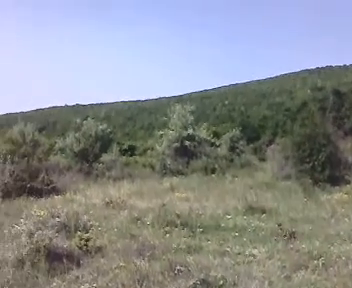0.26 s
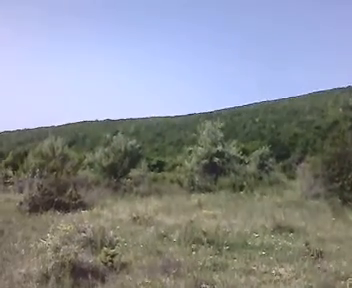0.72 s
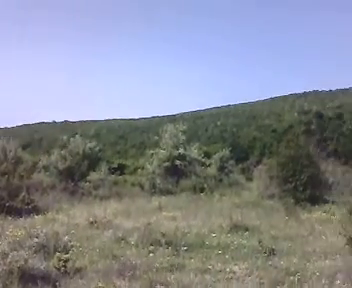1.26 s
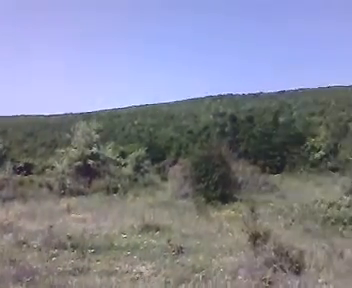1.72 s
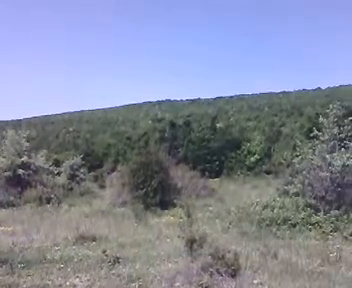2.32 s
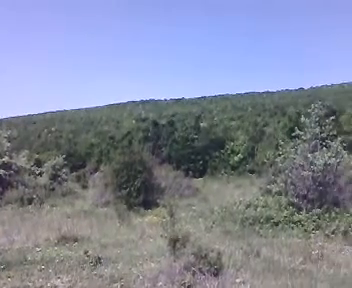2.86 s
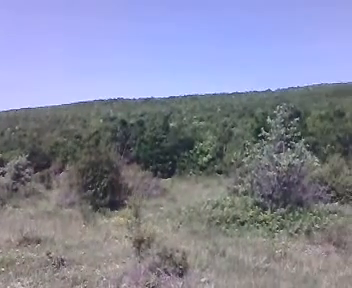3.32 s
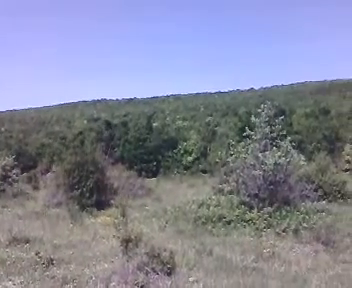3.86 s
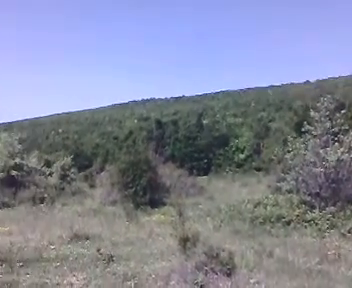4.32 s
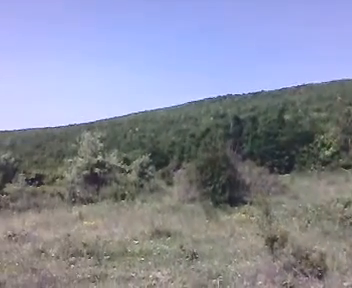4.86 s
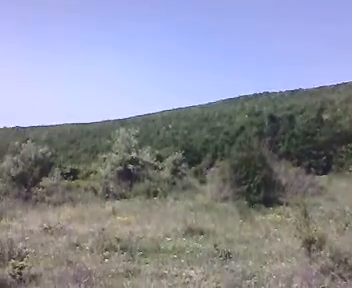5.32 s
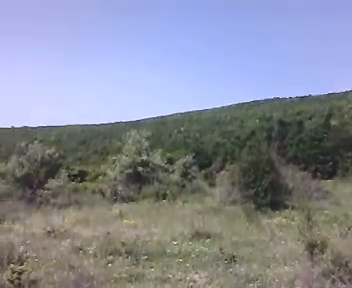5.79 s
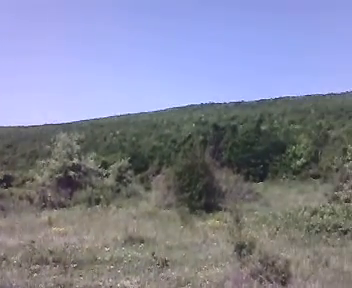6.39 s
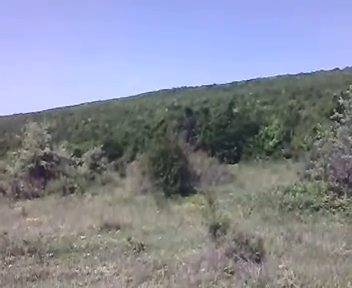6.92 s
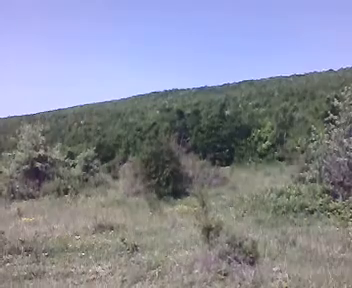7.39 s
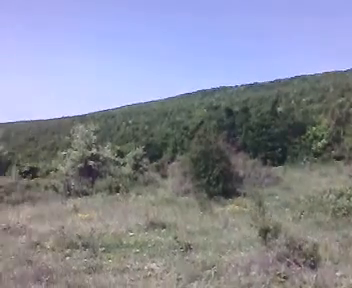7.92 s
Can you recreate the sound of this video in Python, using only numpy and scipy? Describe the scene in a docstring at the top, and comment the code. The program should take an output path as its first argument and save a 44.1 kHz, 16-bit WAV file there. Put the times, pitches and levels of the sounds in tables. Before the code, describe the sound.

Open scrubland, one channel, a small hissy microphone with two barely audible high whines. At 0 s the breathy, hoarse end of a bark fades over a wind puff. Thirteen short barks follow, at about 0.2, 0.6, 1.6, 2.9, 3.4, 3.8, 4.5, 4.9, 5.6, 6.0, 6.4, 7.6 and 8.1 s. Each yelps upward to around 450 Hz, cracks to a held note near 620 Hz, then breaks off roughly, leaving a faint hillside echo. A tiny tick repeats every 0.7 s from 0.65 s. Birds chirp thinly around 1.05 and 1.2 s, lower at 2.1 s, then near 4.8-5.3 and 6.1-7.0 s, over random distant twitter. Low wind thumps swell around 1.9 and 2.4-2.6 s, flutter near 3.6-3.9 s, calm from about 5 to 7 s, and peak at 7.7 s. Small rustles come at 3.9, 7.0 and 7.15 s.

```python
"""Open-air scene in a single channel: a hound on a scrubby hillside, wind, and a small camera's own noise.
At once: the hoarse end of a bark, resonant noise, over filtered-noise gusts, hiss and two thin whines.
From 0.24 s thirteen barks follow in quick runs: harmonics on a gliding pitch, with rasp and a faint echo.
A regular tick joins at 0.65 s and nearer birds, gliding sines, at 1.05 s; fainter twitter falls at random.
Short rustles, puffs of noise, come at 3.9 s and near 7 s; the wind thumps hardest at 7.7 s."""
import sys
import numpy as np
from scipy import signal
from scipy.fft import rfft, irfft
from scipy.io import wavfile

SR = 44100
rng = np.random.default_rng(int(sys.argv[2]) if len(sys.argv) > 2 else 0)


def transcribe(u):
    """Save the signal u as a 16-bit wav file named by the first command-line argument.

    u: samples, shape (n,) or (channels, n), limited to [-1, 1]; the rate is SR.
    q: integer samples, one column per channel.
    """
    v = np.clip(np.atleast_2d(u).T, -1, 1)
    q = np.round(v * 32767).astype(np.int16)
    wavfile.write(sys.argv[1], SR, q)


def undo_db(level):
    """Turn decibels back into plain size, where 20 dB means ten times bigger."""
    steps = np.asarray(level, float) / 20
    return 10 ** steps


N = 359856

# One row a bark: (opening yelp [s], climb [s], yelp level [dB], yelp pitch [Hz],
# held fundamental against the usual voice [dB], held third harmonic likewise [dB], closing pitch [Hz])
BARKS = [(0.242, 0.027, -30.5, 433, 6, 3, 610), (0.613, 0.036, -28.5, 471, 3.5, 8.5, 630),
         (1.567, 0.035, -27, 464.5, 8, 7.5, 456), (2.941, 0.03, -27, 453.5, -11, -4, 430),
         (3.372, 0.03, -30, 428.6, 5.5, -13, 410), (3.766, 0.03, -30.5, 416, 11.5, -10, 460),
         (4.508, 0.036, -31, 439, 0.5, 0.5, 420), (4.934, 0.033, -29.5, 443.5, -9, 2, 385),
         (5.598, 0.026, -29, 428.5, 3, 7, 600), (5.982, 0.029, -33, 388, 16, -7.5, 584),
         (6.386, .038, -27.5, 446.8, -6.5, -17, 385), (7.647, 0.034, -27, 446, -15, 4.5, 400),
         (8.057, 0.034, -31, 435.6, 15, 3, 600)]
# Held part of each bark, one list a bark: (time [s], pitch [Hz], effort [dB], roughness [dB])
HELD_NOTES = [
    [(0.27, 620.4, -36, -3), (0.294, 636, -27, -23.5), (0.31, 659, -29, -18), (0.344, 634, -33, -10),
     (0.36, 618, -41, 1.5)],
    [(0.634, 602, -36, -3.5), (0.653, 626, -25, -34.5), (0.665, 637.4, -24.5, -37),
     (0.697, 621, -24.5, -28.5), (0.707, 663, -29.5, -14.5), (0.732, 638, -35, -4.5)],
    [(1.6, 626.6, -28, -26), (1.63, 617.5, -27.5, -31), (1.666, 626, -33, -23), (1.682, 550, -35, -17)],
    [(2.967, 613, -23.5, -19), (2.989, 642.8, -22, -13), (3.029, 701.4, -27.5, -22),
     (3.043, 593, -20, -25.5), (3.065, 631, -26.5, -24.5)],
    [(3.411, 598, -35, -3.5), (3.423, 639.4, -27, -20), (3.455, 671.5, -30.5, -18), (3.476, 662, -34, -10),
     (3.49, 617, -26, -22), (3.503, 600, -36.5, -7)],
    [(3.806, 623.4, -27, -18.5), (3.844, 625, -28, -30.5), (3.862, 633.5, -29, -25.5),
     (3.878, 647, -35.5, -9)],
    [(4.537, 613, -31, -12.5), (4.555, 600, -31, -15), (4.591, 586.5, -29, -17), (4.627, 621, -31.5, -14)],
    [(4.966, 616, -26, -17.5), (5.02, 584.4, -25.5, -18.5), (5.036, 612, -26, -30.5),
     (5.048, 620, -31, -31)],
    [(5.635, 648.6, -20.5, -13), (5.641, 642, -21.5, -22), (5.665, 665.7, -23.5, -19.5),
     (5.705, 658.5, -24, -23), (5.714, 650, -31.5, -11), (5.731, 624, -36, -3.5)],
    [(6.02, 559, -39.5, -18), (6.029, 593, -28, -28), (6.055, 593.5, -31, -35), (6.079, 601, -27.5, -16.5),
     (6.087, 644, -37.5, -13), (6.105, 629, -39, -10.5)],
    [(6.408, 576.6, -27, -15), (6.416, 605, -18.5, -27), (6.442, 654, -20, -31), (6.478, 624.5, -28, -13.5),
     (6.515, 466, -36, -13.5)],
    [(7.694, 650, -25.5, -13.5), (7.748, 562.3, -30.5, -18), (7.758, 617.5, -24, -33),
     (7.768, 615, -34, -19)],
    [(8.091, 564, -39.5, -22), (8.101, 616.3, -35, -10), (8.141, 587, -38.5, -12.5), (8.158, 590, -39, -6)],
]
# Climb common to all barks: (share of climb still to go [1], share of yelp pitch [1],
# level against the yelp [dB], roughness [dB])
CLIMB = [(.999, .68, -15, -9), (0.54, .86, -17, -16.5), (0.0044, .999, -1.36, -18.5)]
# Slackening folds: (time after the held part [s], level against its end [dB], roughness [dB])
RELEASE = [(.015, -13, -3.5), (0.035, -24, -12.5)]
# Usual fundamental against effort: (pitch [Hz], level [dB])
FIRST_HARMONIC = [(300, -15), (420, -27), (530, -15), (600, -19.5), (650, -16), (690, 4)]
# Second harmonic passing a dull spot of the throat: (pitch [Hz], weight [dB])
SECOND_HARMONIC = [(300, -11), (380, 3.5), (435, 3), (480, -5.5), (530, -0.5), (585, -0.8)]
# Usual third harmonic against effort: (pitch [Hz], level [dB])
THIRD_HARMONIC = [(300, 0.5), (430, -3), (520, -2), (600, -12), (660, -18.5)]
# Colour of the harmonics above the third: (frequency [Hz], level [dB])
MOUTH_COLOUR = [(1200, 4.5), (2000, -15), (2500, -23.5), (3100, -39.5), (3780, -39), (5000, -68.5)]
# Colour of the breathy rasp: (frequency [Hz], level [dB])
RASP_COLOUR = [(400, -33.5), (850, 0.5), (1030, -24), (1280, -15.5), (1500, -10.5), (1750, -0.5),
               (2400, -3.5), (2900, -20), (4000, -58.5)]
# Fixed resonance of the throat, one row: (frequency [Hz], width [Hz], level [dB])
THROAT = (850, 110, -4)
# Hoarse end of an earlier bark: (time [s], level [dB], centre frequency [Hz])
HOARSE_END = [(0.0, -46, 1440), (0.008, -42.5, 1378), (0.164, -58, 1127), (0.2, -53, 1200)]
# Near-sine bird notes: (time [s], length [s], start [Hz], middle [Hz], end [Hz], level [dB])
CHIRPS = [(1.048, 0.0088, 4380, 4640, 5000, -62), (1.062, 0.0086, 5200, 5000, 4900, -54),
          (1.069, 0.047, 4650, 4620, 4740, -57.5), (1.203, .012, 4320, 4520, 4800, -65),
          (1.217, 0.013, 4800, 4800, 4700, -59), (1.226, 0.042, 4600, 4550, 4550, -60),
          (2.131, 0.02, 1500, 1720, 1760, -39.5), (2.147, 0.038, 1820, 1824, 1800, -41.5),
          (2.181, 0.038, 1690, 1590, 930, -51.5), (4.754, 0.026, 2750, 2960, 3200, -66),
          (5.054, 0.039, 3220, 2950, 2710, -65), (5.141, 0.034, 3100, 3000, 2660, -67),
          (5.25, 0.019, 3110, 2840, 2754, -63), (6.103, 0.032, 3950, 3670, 3600, -60.5),
          (6.17, 0.04, 5700, 4860, 4300, -63), (6.198, 0.095, 4450, 4080, 3900, -61.5),
          (6.214, 0.09, 3570, 3270, 3150, -67), (6.436, 0.038, 3950, 3640, 3700, -57.5),
          (6.59, 0.041, 5950, 5460, 4200, -61), (6.601, 0.043, 3250, 3440, 3520, -58),
          (6.867, 0.098, 3150, 3060, 2900, -65), (6.942, 0.057, 4260, 3840, 3950, -61),
          (7.005, 0.042, 1300, 1466, 1700, -55)]
# Short rustles: (time [s], level [dB], centre [Hz], width [Hz], Gaussian spread [s])
RUSTLES = [(3.872, -51.5, 5030, 890, 0.0045), (7.004, -50.5, 1200, 700, 0.026),
           (7.155, -45.5, 3550, 1000, 0.0093)]
# Decay of the hillside's echo: (frequency [Hz], time to fall 60 dB [s])
SLOPE_DECAY = [(500, 0.42), (1300, 0.53), (2500, 0.73)]
# Strength of the wind: (time [s], level [dB])
WIND_STRENGTH = [(0.0, -42.5), (0.07, -32), (0.13, -52), (0.29, -44.5), (0.59, -58.5), (1.41, -59.5),
                 (1.45, -53), (1.82, -63), (1.91, -33.5), (1.95, -31), (2.07, -48.5), (2.2, -52),
                 (2.23, -36), (2.36, -50), (2.41, -26), (2.54, -31), (2.57, -26.5), (2.61, -44),
                 (2.95, -58.5), (3.5, -38), (3.57, -42), (3.61, -30), (3.84, -36.5), (3.88, -29.5),
                 (4.0, -61), (4.2, -42), (4.23, -55), (4.39, -36), (4.45, -48.5), (4.61, -39),
                 (4.63, -49.5), (4.82, -56.5), (4.86, -42), (4.91, -53.5), (5.64, -61), (7.07, -61),
                 (7.3, -35), (7.41, -49), (7.45, -31.5), (7.54, -33), (7.68, -20), (7.73, -31.5),
                 (7.95, -32.5), (7.98, -50.5), (8.09, -41), (8.16, -50)]
# Colour of the wind's thumps: (frequency [Hz], level [dB])
THUMP_COLOUR = [(8.8, -58.5), (15, -18.5), (45, -2.5), (87, -1.5), (102, -1.5), (123, -6), (151, -9),
                (200, -19.5), (260, -53), (440, -120)]
# Colour of the wind's upper rumble: (frequency [Hz], level [dB])
ROAR_COLOUR = [(80, -17), (140, 3.5), (250, -0.5), (350, -9), (550, -50)]
# Colour of the hiss: (frequency [Hz], level [dB])
HISS_COLOUR = [(24, -30), (40, 0), (169, -18), (344, -8.5), (714, -13.5), (4700, -26.5), (7160, -30.5),
               (8000, -37), (10400, -76.5), (17600, -120)]
# Thin steady whines: (frequency [Hz], peak level [dB])
WHINES = [(3660, -74.5), (6098, -73)]


def evened(x):
    """Normalisation: scales a signal to rms 1."""
    return x / np.sqrt(np.mean(abs(x) ** 2) + 1e-20)


def read(points, hz):
    """Spectral interpolation: reads a table linearly in level along a logarithmic frequency axis."""
    f, value = np.transpose(points)
    return np.interp(np.log(hz + 1), np.log(f + 1), value)


def curve(rows, t):
    """Linear interpolation: the columns of a table at times t."""
    s, *columns = np.transpose(rows)
    return [np.interp(t, s, c) for c in columns]


def add(mix, s, sound):
    """Superposition: sums a sound into the mix from time s."""
    part = mix[round(s * SR):][:len(sound)]
    part += sound[:len(part)]


def coloured(points, count):
    """Spectral shaping: white noise weighted by a spectrum table, at rms 1."""
    spectrum = rfft(rng.standard_normal(count))
    gain = undo_db(read(points, np.fft.rfftfreq(count, 1 / SR)))
    return evened(irfft(spectrum * gain, count))


def flutter(count, hz):
    """Narrow-band modulation: complex noise low-passed at hz, with rms 1."""
    z = rng.standard_normal((count, 2)) @ [1, 1j]
    return evened(signal.lfilter(*signal.butter(2, hz, fs=SR), z))


def gesture(yelp, climb, yelp_db, yelp_hz, first_db, third_db, closing_hz, held):
    """Vocal control: climb, yelp, crack, held note and release set pitch, effort and harmonic balance."""
    opened, open_hz, *_ = held[0]
    closed, _, last_db, _ = held[-1]
    crack = (yelp + opened) / 2  # the voice cracks midway to the held note
    rows = [(yelp - ahead * climb, share * yelp_hz, yelp_db + db, rough_db)
            for ahead, share, db, rough_db in CLIMB]
    rows.append((crack, yelp_hz + 0.52 * (open_hz - yelp_hz), yelp_db - 3.5, -15))
    rows += list(held)
    rows += [(closed + s, closing_hz, last_db + db, rough_db) for s, db, rough_db in RELEASE]
    t = np.arange(rows[0][0], rows[-1][0], 1 / SR)
    hz, effort_db, rough_db = curve(rows, t)

    settled = np.interp(t, [crack, opened], [0, 1])
    sag = (t > opened) * np.maximum(np.log2(open_hz / hz), 0)  # octaves below the held note's opening pitch

    # roughness weakens the fundamental; a sagging pitch brings it forward
    rough_loss_db, dull_db_per_octave = -20, 43.5
    fundamental_db = read(FIRST_HARMONIC, hz * 2 ** sag)
    fundamental_db += settled * (first_db + rough_loss_db * undo_db(rough_db))
    fundamental_db += dull_db_per_octave * sag

    # the third harmonic fades as the held note ends; 0.43 octaves of sag restore its usual strength
    closing_db = np.interp(t, [closed - 0.033, closed], [0, -6])
    departure_db = settled * (third_db + closing_db) * np.maximum(1 - sag / 0.43, 0)
    third_harmonic_db = read(THIRD_HARMONIC, hz) + departure_db
    return t, hz, effort_db, np.minimum(fundamental_db, 0), third_harmonic_db, rough_db


def bark(t, hz, effort_db, first_db, third_db, rough_db):
    """Source and filter: harmonics of the folds, made rough by uneven cycles, excite a throat resonance."""
    count = len(t)
    # the folds start and slacken cleanly
    rough = undo_db(rough_db) * np.clip(np.minimum(t - t[0], t[-1] - t) / 0.04, 0.15, 1)
    jitter = 1 + 0.16 * rough * flutter(count, hz=73.4).real
    turns = np.cumsum(hz * jitter) / SR

    first, third = undo_db(first_db), undo_db(third_db)
    # the second harmonic carries the rest of the effort
    remainder = np.maximum(1 - first ** 2 - third ** 2 - rough ** 2, 0.04)
    second = np.sqrt(remainder) * undo_db(read(SECOND_HARMONIC, hz))
    upper = [undo_db(read(MOUTH_COLOUR, k * hz) + 0.66 * third_db) for k in range(4, 10)]

    # harmonics from the third up come and go
    uneven_db, uneven_hz = 3.2, 30
    third, *upper = [a * undo_db(uneven_db * np.sqrt(2) * flutter(count, uneven_hz).real)
                     for a in [third] + upper]

    wobble = 1.2 * rough ** 0.75  # each harmonic swells and breaks on its own
    folds = np.zeros(count, complex)
    for k, a in enumerate([first, second, third] + upper, 1):
        folds += a * (1 + wobble * flutter(count, hz=54.3)) * np.exp(2j * np.pi * k * turns)

    # a pattern over three cycles adds side lines between the harmonics
    beat = (flutter(count, hz=45) * np.exp(2j * np.pi * turns / 3)).real
    uneven = 1 + rough * (1.2 * beat + 0.7 * flutter(count, hz=300))
    rasp = 0.8 * rough * coloured(RASP_COLOUR, count)
    voice = np.sqrt(2) * (folds * uneven).real + rasp
    voice = undo_db(effort_db) * voice * signal.windows.tukey(count, 0.14)

    ring_hz, width_hz, ring_db = THROAT
    ring = signal.lfilter(*signal.iirpeak(ring_hz, ring_hz / width_hz, SR), voice)
    return t[0], voice + undo_db(ring_db) * ring


def hoarse():
    """Resonance of turbulence: noise flutters round one moving throat resonance, with rasp."""
    t = np.arange(HOARSE_END[0][0], HOARSE_END[-1][0], 1 / SR)
    level_db, hz = curve(HOARSE_END, t)
    ring = (flutter(len(t), hz=82) * np.exp(2j * np.pi * np.cumsum(hz) / SR)).real
    return t[0], undo_db(level_db) * evened(ring + 0.1 * coloured(RASP_COLOUR, len(t)))


def chirp(s, length, start_hz, middle_hz, end_hz, db):
    """Frequency modulation: one gliding sine, roughened by the moving air on its way."""
    u = np.linspace(0, 1, round(length * SR))
    hz = np.interp(u, [0, 0.5, 1], [start_hz, middle_hz, end_hz])
    rough_air = 1 + 0.4 * flutter(len(u), hz=110)
    note = rough_air * np.exp(2j * np.pi * np.cumsum(hz) / SR)
    return s, np.sqrt(2) * undo_db(db) * note.real * signal.windows.tukey(len(u), 0.55)


def twitter():
    """Random superposition: birds further off give faint, short, falling notes at random times."""
    notes_per_s, faintest_db = 6, -76
    draws = rng.random((int(notes_per_s * N / SR), 5))
    for when, long, high, fall, loud in draws:
        hz = 2400 + 2600 * high
        drop = 1 - 0.094 * fall  # end pitch over start pitch
        yield chirp(when * N / SR, 0.028 + 0.075 * long, hz, hz * np.sqrt(drop), hz * drop,
                    faintest_db + 7 * loud)


def rustle(s, db, hz, width_hz, spread):
    """Band-limited turbulence: a puff of noise round one pitch under a Gaussian envelope."""
    t = np.arange(-3 * spread, 3 * spread, 1 / SR)
    puff = (flutter(len(t), width_hz / 2) * np.exp(2j * np.pi * hz * t)).real
    return s + t[0], undo_db(db) * puff * np.exp(-0.5 * (t / spread) ** 2)


def hillside(x):
    """Scattering: bushes and slope return sparse echoes, each band decaying at its own rate."""
    taps = np.zeros(SR)
    at = np.arange(900, SR - 20, 20)
    taps[at + rng.integers(0, 20, len(at))] = rng.choice([-1., 1.], len(at))
    hz, t, z = signal.stft(taps, SR, nperseg=256)
    decay = undo_db(-60 * t / read(SLOPE_DECAY, hz)[:, None])
    tail = signal.istft(z * decay, SR, nperseg=256)[1]
    echo = signal.fftconvolve(x, tail / np.linalg.norm(tail))[:N]
    return echo * (0.78 + 0.62 * flutter(N, hz=220).real)  # swaying leaves blur the returns


def wind():
    """Turbulent pressure: eddies thump the microphone in lumps; upper rumble comes in sharper bursts."""
    level_db, = curve(WIND_STRENGTH, np.arange(N) / SR)
    lumps = flutter(N, hz=23.8).real
    thump = evened(coloured(THUMP_COLOUR, N) * undo_db(3.8 * lumps))
    roar = evened(coloured(ROAR_COLOUR, N) * undo_db(4.5 * lumps))
    # the rumble gains 0.99 dB for each dB of thump and never quite stops
    roar_gain = np.hypot(undo_db(-14.5 + 0.99 * level_db), undo_db(-59))
    return undo_db(level_db) * thump + roar_gain * roar


def camera():
    """Self-noise: coloured hiss, two phase-wavering whines and a faint noise tick at a steady pace."""
    t = np.arange(N) / SR
    out = undo_db(-54) * coloured(HISS_COLOUR, N) * undo_db(1.7 * flutter(N, hz=5.7).real)
    for hz, db in WHINES:
        waver = 1.6 * flutter(N, hz=14).real  # radians
        out += undo_db(db) * np.sin(2 * np.pi * hz * t + waver)
    first_s, every_s, count = 0.647, 0.7062, 500  # count: samples in a tick
    for s in np.arange(first_s, N / SR, every_s):
        tick = coloured([(1500, -21), (3500, -17), (5600, 2), (7500, -10.5)], count)
        add(out, s, undo_db(-52) * np.hanning(count) * tick)
    return out


def scene():
    """Superposition: dog, birds and rustles with their echo, then wind and the camera's own noise."""
    far = np.zeros(N)
    for row, held in zip(BARKS, HELD_NOTES):
        add(far, *bark(*gesture(*row, held)))
    add(far, *hoarse())
    for row in CHIRPS:
        add(far, *chirp(*row))
    for note in twitter():
        add(far, *note)
    for row in RUSTLES:
        add(far, *rustle(*row))
    mix = far + undo_db(-20.5) * hillside(far) + wind() + camera()
    return mix[None]


def top_cut(x):
    """Nothing passes above the cut-off."""
    return signal.sosfilt(signal.butter(12, 8730, fs=SR, output="sos"), x)


def record(dry):
    """Band limitation: a steep linear-phase low-pass at 7500 Hz finishes the mix."""
    edge = signal.firwin(401, 7500, window=("kaiser", 7), fs=SR)
    mix = signal.oaconvolve(dry, edge[None], "same")
    return top_cut(mix)


dry = scene()
out = record(dry)
transcribe(out)
```